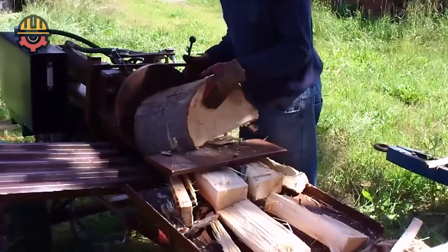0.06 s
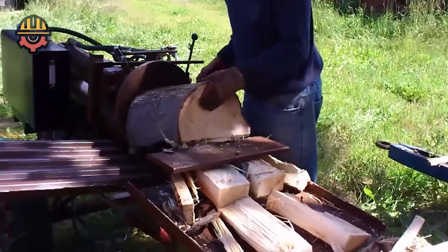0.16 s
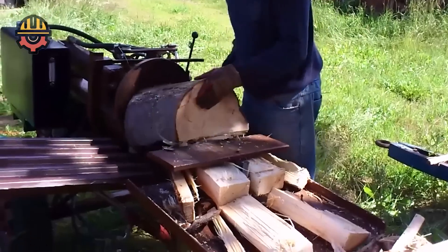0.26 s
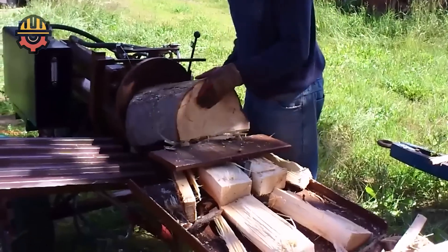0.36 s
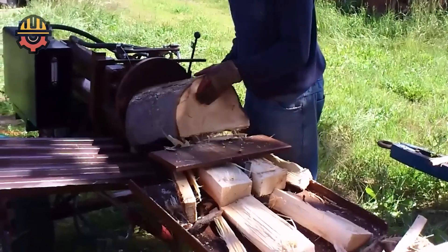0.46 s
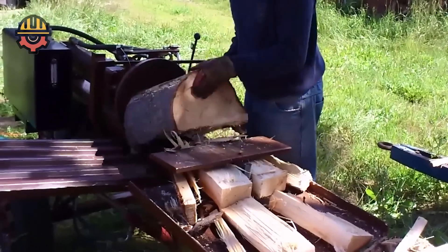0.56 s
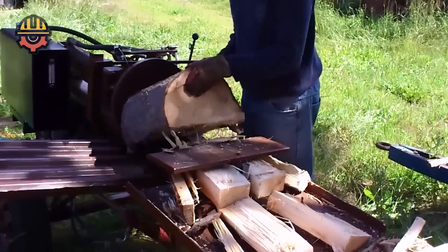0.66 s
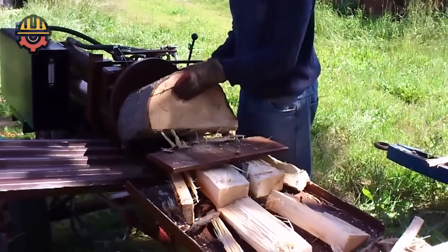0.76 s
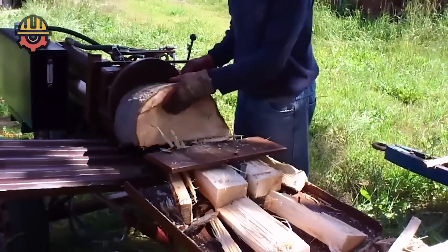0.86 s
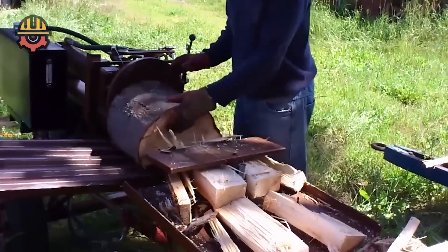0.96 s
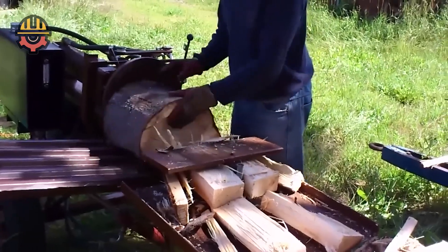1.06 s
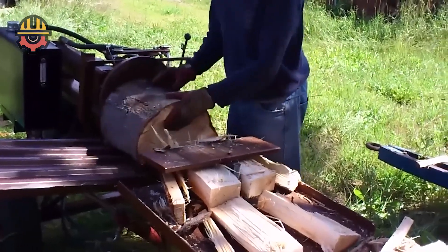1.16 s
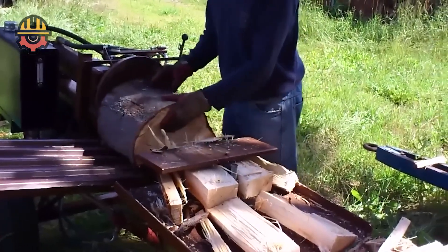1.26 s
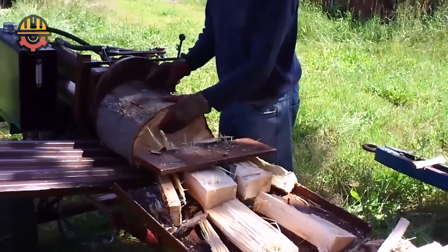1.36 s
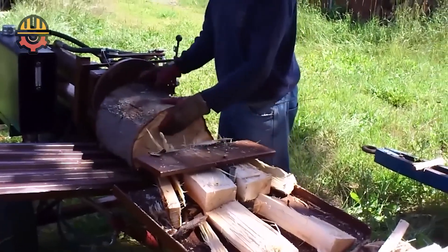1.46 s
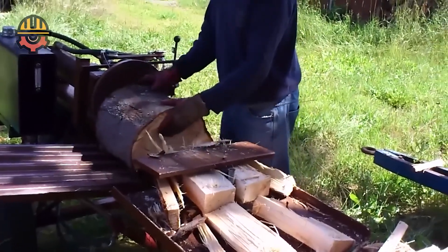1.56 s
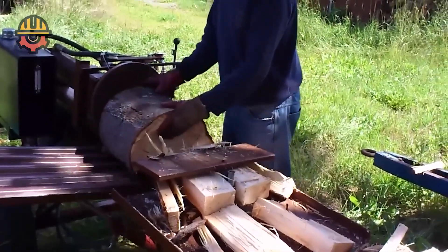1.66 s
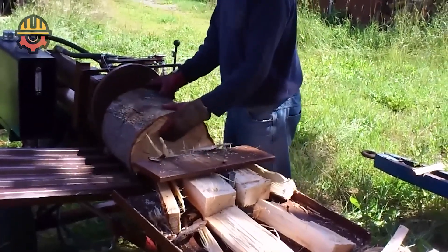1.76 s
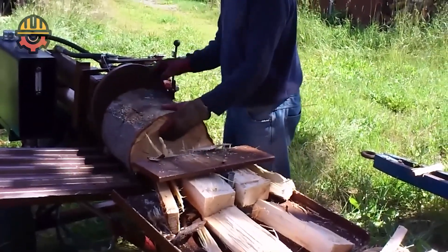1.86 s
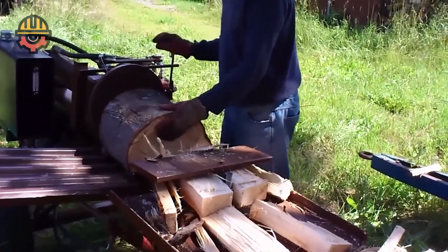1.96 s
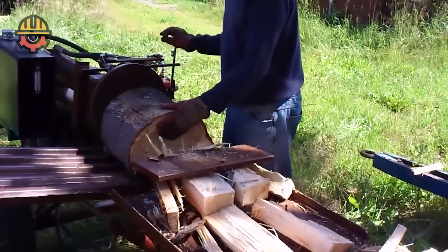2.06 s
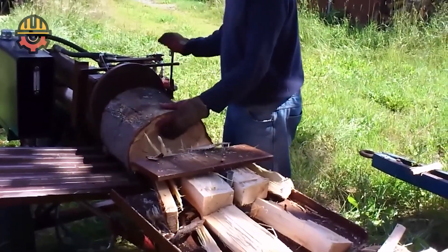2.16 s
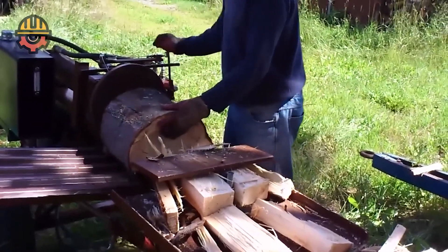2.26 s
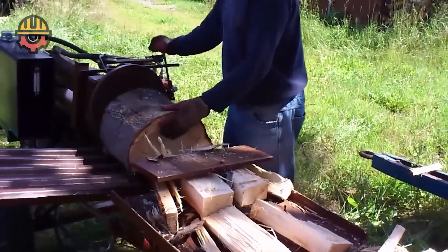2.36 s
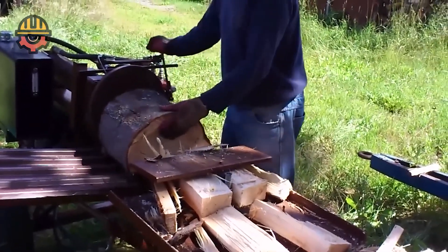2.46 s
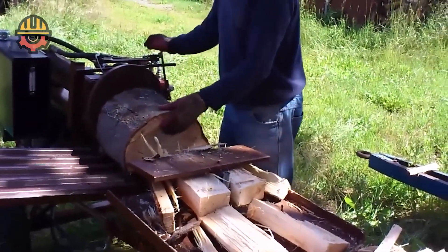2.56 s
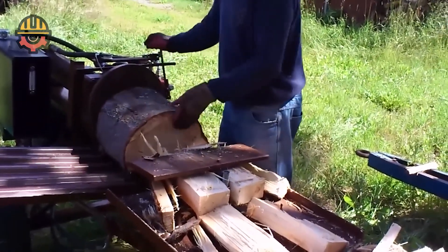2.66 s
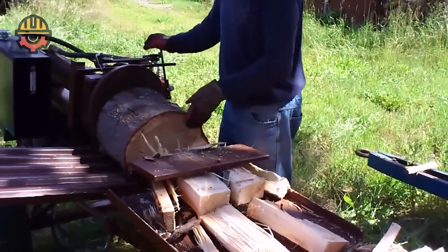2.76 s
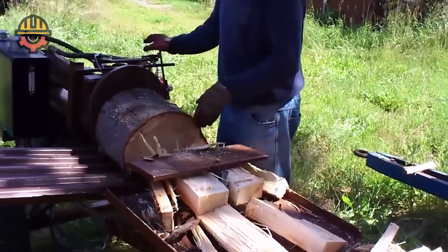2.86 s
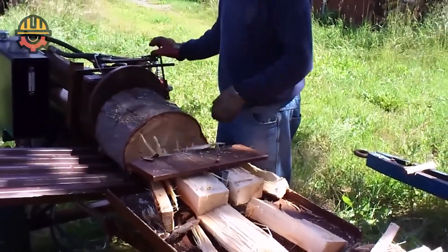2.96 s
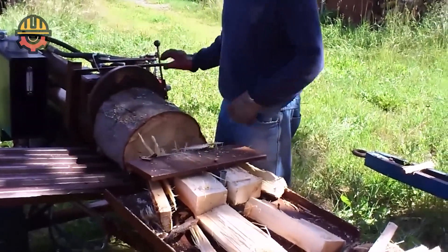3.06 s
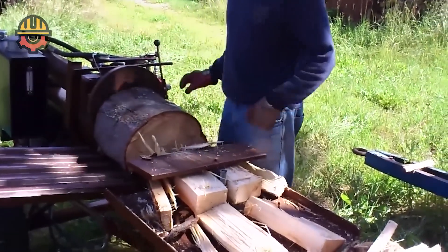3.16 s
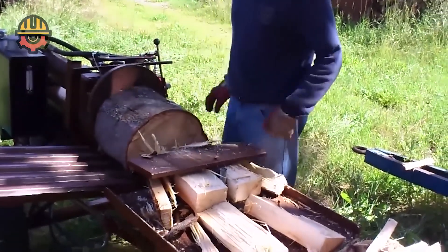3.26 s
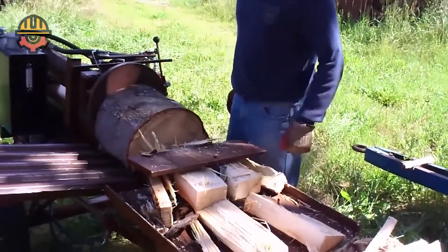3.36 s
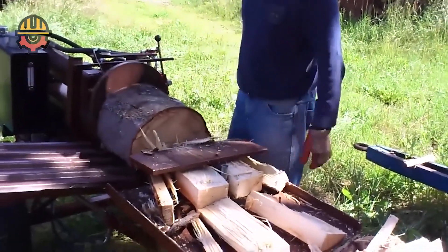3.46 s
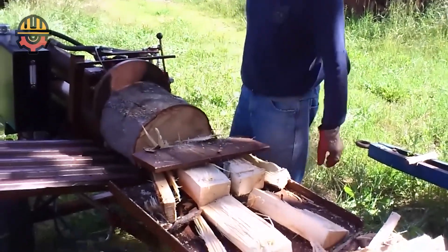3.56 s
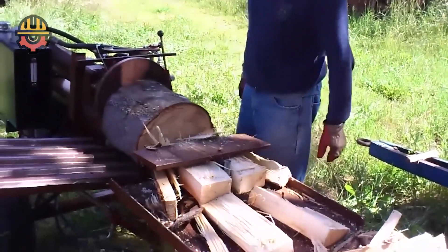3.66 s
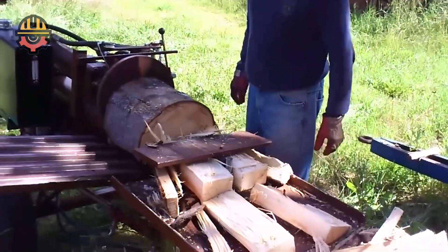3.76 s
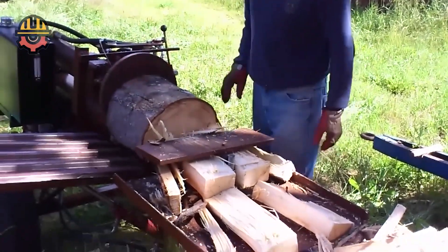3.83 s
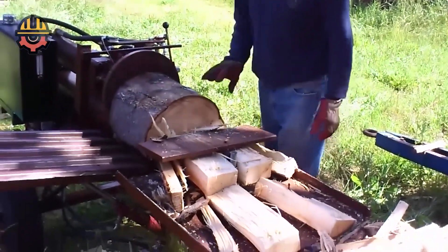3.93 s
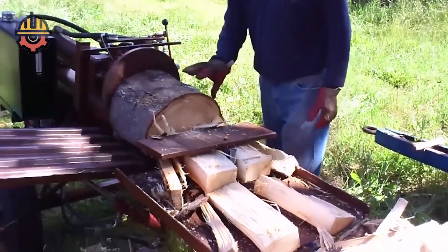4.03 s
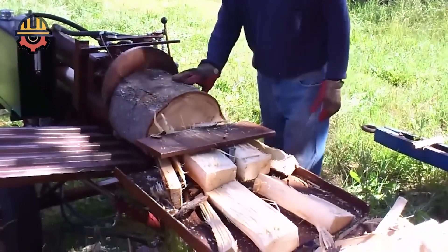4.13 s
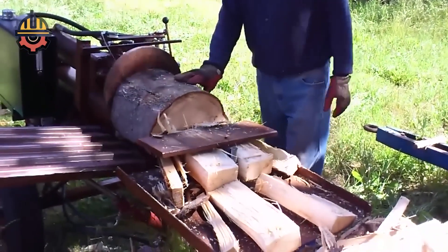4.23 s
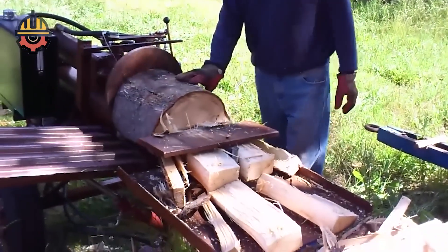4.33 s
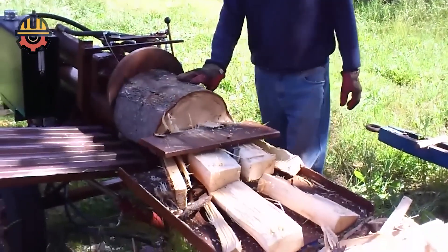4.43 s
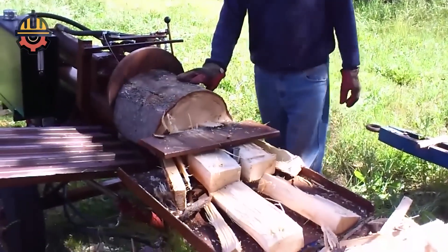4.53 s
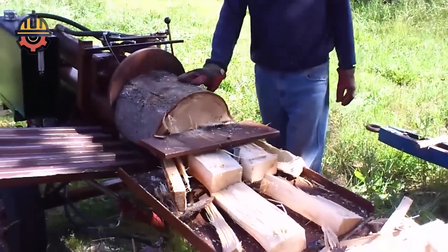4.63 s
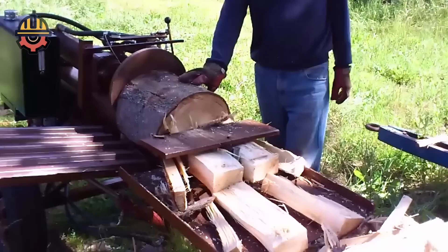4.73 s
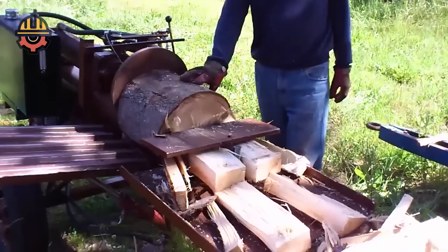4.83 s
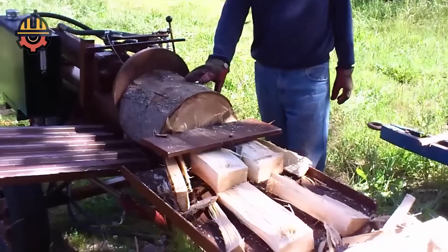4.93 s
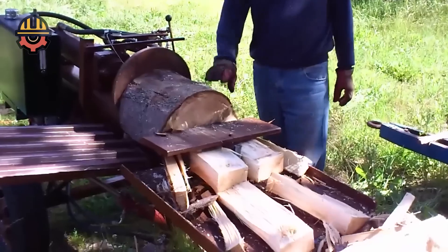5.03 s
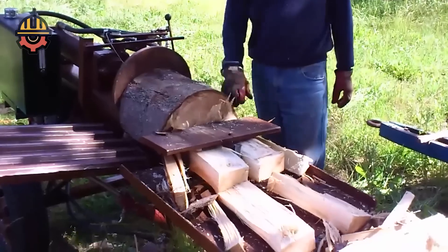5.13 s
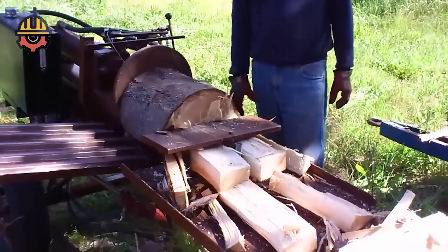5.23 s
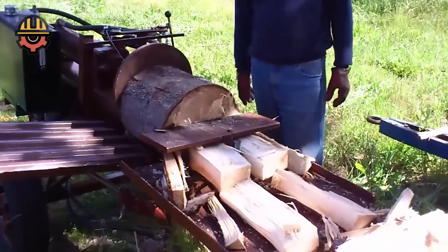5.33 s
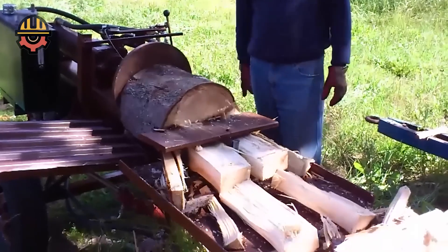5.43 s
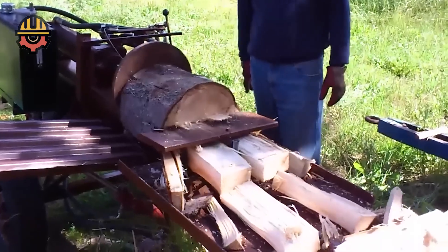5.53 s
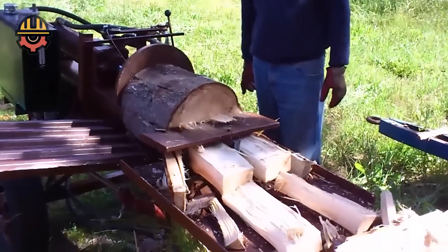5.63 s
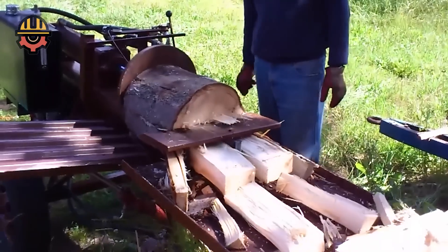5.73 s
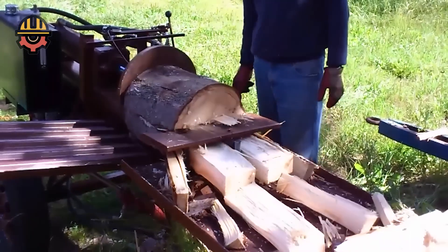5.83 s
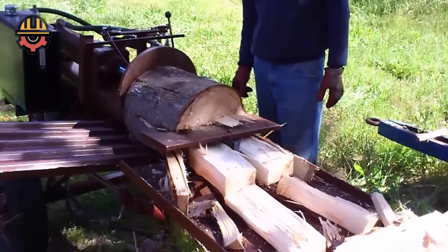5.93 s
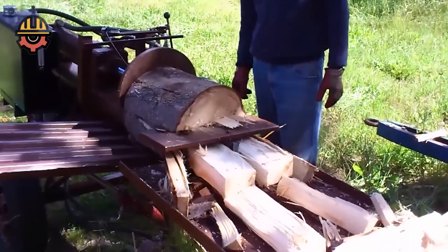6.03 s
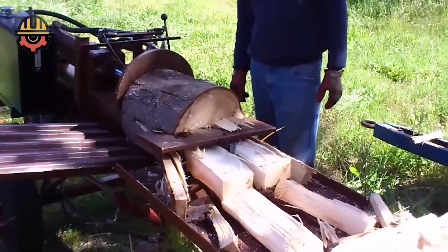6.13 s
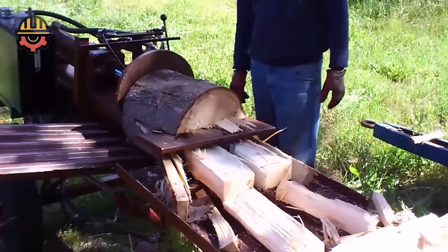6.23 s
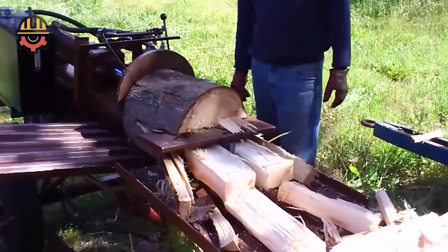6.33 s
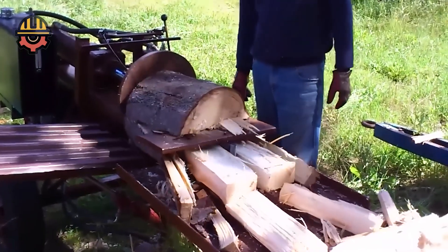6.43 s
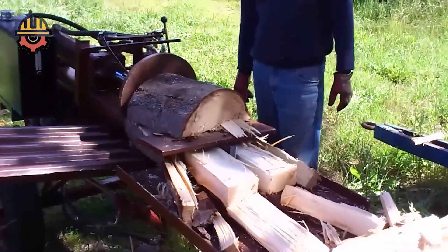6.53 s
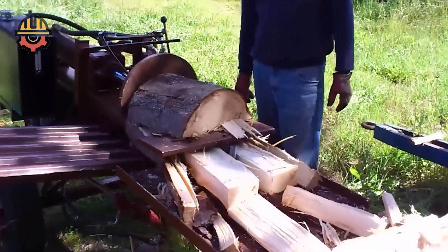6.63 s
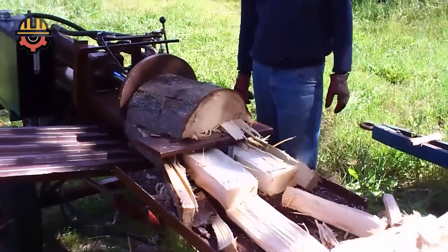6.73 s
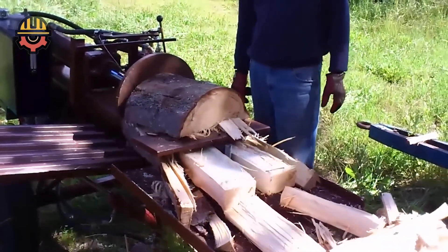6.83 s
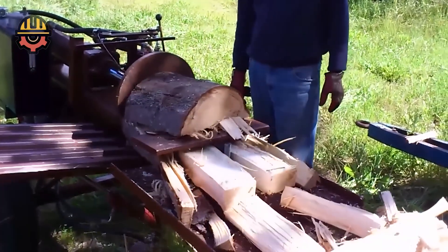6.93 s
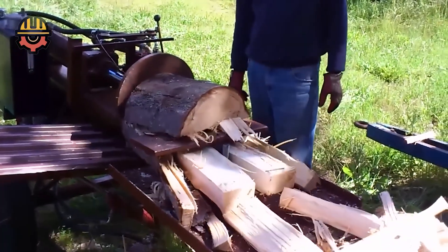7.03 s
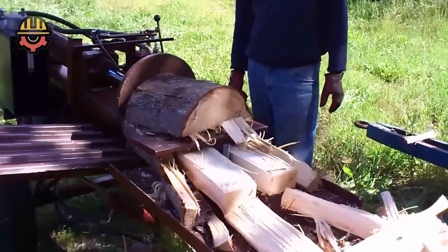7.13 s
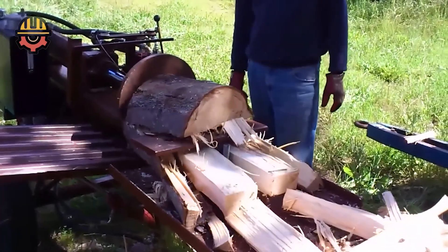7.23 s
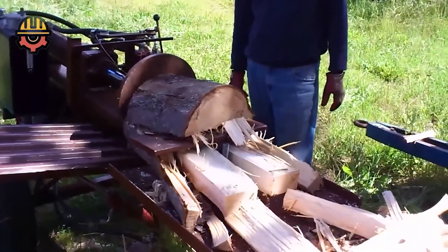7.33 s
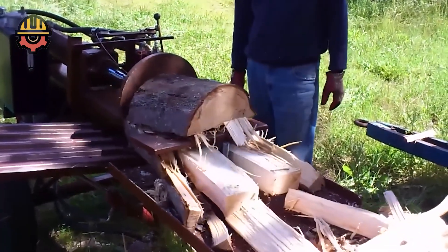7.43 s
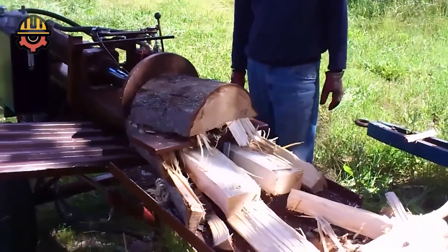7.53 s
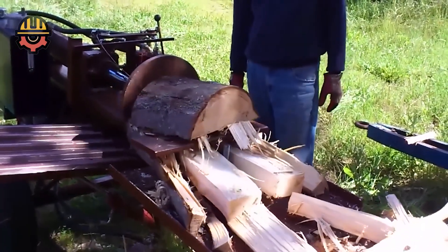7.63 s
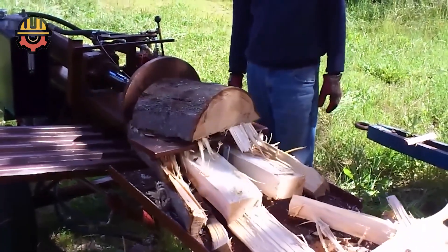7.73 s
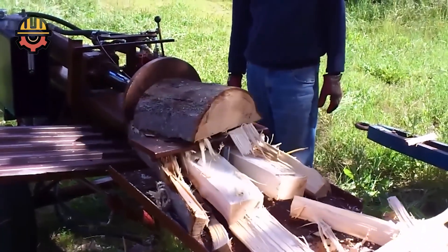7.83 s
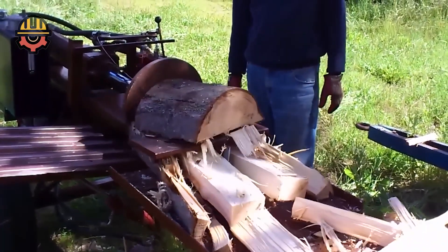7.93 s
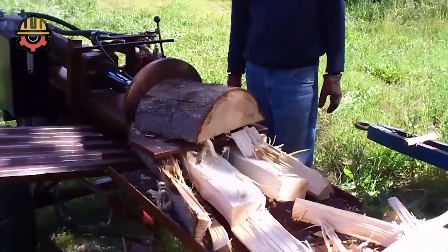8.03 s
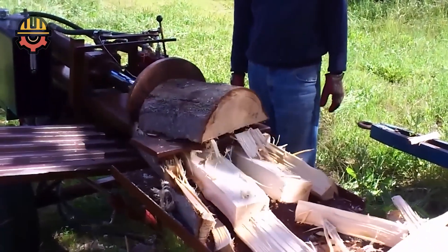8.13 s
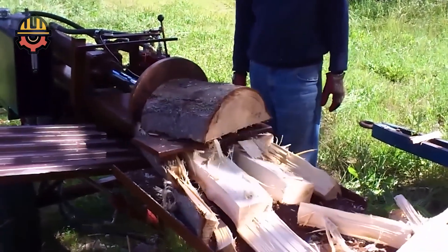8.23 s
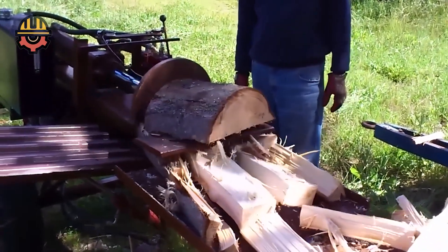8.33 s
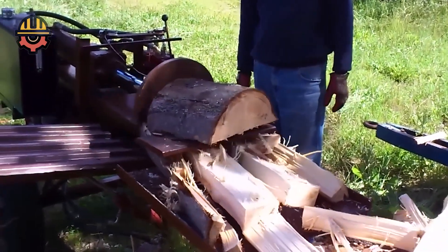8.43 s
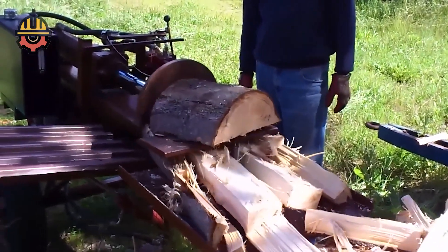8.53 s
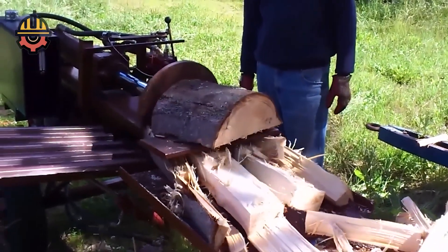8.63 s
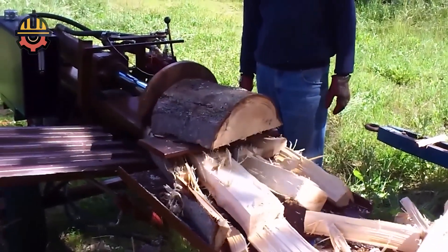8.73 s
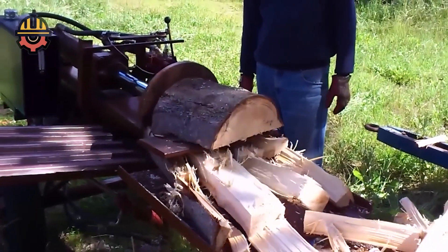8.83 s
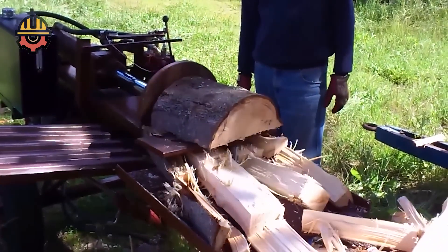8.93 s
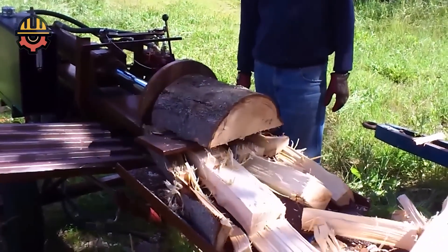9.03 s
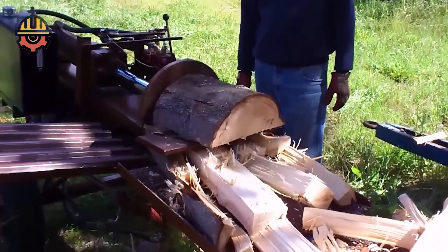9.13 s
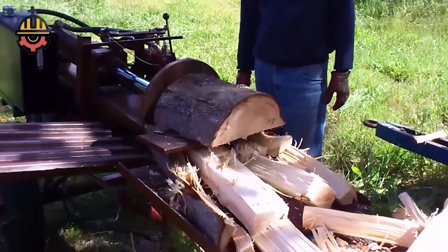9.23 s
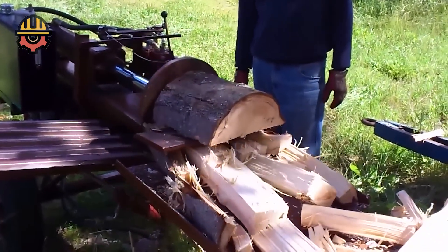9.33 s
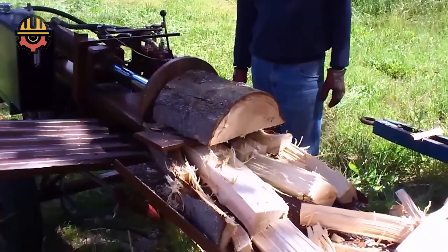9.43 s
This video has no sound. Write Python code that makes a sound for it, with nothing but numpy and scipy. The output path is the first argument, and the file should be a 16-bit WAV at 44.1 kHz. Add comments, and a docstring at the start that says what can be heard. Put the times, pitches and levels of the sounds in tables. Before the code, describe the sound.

Outdoors, a hydraulic splitter's electric whine sags under load while wood pops sparsely, then breaks into dense sharp cracks, fibrous ripping and hollow thuds.

```python
"""A gear pump whines in a yard from the first moment, over a soft rumble; soon wood cracks and thuds.
The pump is a stack of tooth tones plus rattle and hiss; an electric motor drives it and sags under load.
A log is rolled and dropped on the steel bed, then a ram pushes it through the blades. Cracks, tearing and
knocks on bed and tray are noise bursts through resonances; a blade groans in stick-slip jerks.
A pair of microphones hears it all from a few metres away."""
import sys
import numpy as np
from scipy import signal
from scipy.fft import rfft, irfft, next_fast_len
from scipy.io import wavfile
from scipy.ndimage import uniform_filter1d, map_coordinates

SR = 44100
rng = np.random.default_rng(int(sys.argv[2]) if len(sys.argv) > 2 else 0)


def generate_wav(signal):
    """Clip the signal to [-1, 1] and save it as 16-bit WAV at the path in sys.argv[1]."""
    frames = np.transpose(np.atleast_2d(signal))
    scaled = np.clip(frames, -1, 1) * 32767
    pcm = np.round(scaled).astype(np.int16)
    wavfile.write(sys.argv[1], SR, pcm)


N = 418068  # length in samples
TEETH = 12  # on the pump gear
TOP_HZ = 16300  # nothing much is heard above this
PUMP_LEAD, WOOD_LEAD = 5, 2  # samples by which the left microphone hears pump and wood first

# Relative noise spectrum of the motor and pump casing: pitch_hz [Hz], level_db [dB per Hz]
CASING_SPECTRUM = [(120, -21), (200, -14.5), (448, -19.5), (590, -5), (659, -9), (916, -15), (1810, -14.5),
                   (2650, -22), (3490, -16), (3830, -17), (4040, -12.5), (5130, -18), (8740, -14),
                   (13300, -24.5), (16000, -48)]
# Ringing modes of the log: pitch_hz [Hz], width_hz [Hz], level_db [dB]
LOG_MODES = [(540, 170, -4), (808, 45, 1), (1060, 35, -3), (1420, 190, -9.5)]


def undb(db):
    """Turn decibels into a gain."""
    return 10 ** (np.asarray(db) / 20)


def level(x, db):
    """Scale a sound to an rms level in dB."""
    return x * undb(db) / np.sqrt(np.mean(x ** 2))


def curves(table):
    """Columns of a table at every sample, joined by straight lines in time."""
    s, *columns = np.transpose(table)
    times = np.arange(N) / SR
    return [np.interp(times, s, column) for column in columns]


def on_log(table, hz):
    """Read a table at the given frequencies, with straight lines on a logarithmic pitch scale."""
    pitch_hz, value = np.transpose(table)
    return np.interp(np.log(hz + 1), np.log(pitch_hz), value)


def pair(a, b, hz, spectrum, lead):
    """Left and right spectra from two unrelated ones, alike in the bass, coloured; the right comes late."""
    # How alike the two sides are: pitch_hz [Hz], likeness [0 to 1]
    side_likeness = [(20, 0.76), (60, 1), (300, 0.98), (700, 1), (1400, 0.28), (3000, 0.42), (16000, 0.064)]
    likeness = np.clip(on_log(side_likeness, hz), -.95, .99)
    mid = a * np.sqrt(1 + likeness)
    side = b * np.sqrt(1 - likeness)
    delay = np.exp(-2j * np.pi * hz * lead / SR)
    return np.array([mid + side, (mid - side) * delay]) * undb(on_log(spectrum, hz))


def colour(a, b, spectrum, lead):
    """Stereo sound of rms 1 with the given spectrum."""
    n = next_fast_len(N)
    hz = np.arange(n // 2 + 1) * SR / n
    both = pair(rfft(a, n), rfft(b, n), hz, spectrum, lead)
    return level(irfft(both, n)[:, :N], 0)


def band(x, hz, width):
    """One resonance: keeps a band of the given width in Hz, within limits that keep the filter sound."""
    sharpness = max(hz / width, .3)
    return signal.lfilter(*signal.iirpeak(min(hz, .4 * SR), sharpness, SR), x)


def walk(rate):
    """Random levels rate times a second, joined smoothly; spread near 1."""
    k = int(SR / rate)
    levels = rng.standard_normal(N // k + 2)
    joined = np.interp(np.arange(N) / k, np.arange(len(levels)), levels)
    return 1.3 * uniform_filter1d(joined, k)


def swell(s, length, attack, fall_db_s, sag_db=0.):
    """Gain that rises, holds (sagging) until length is over, then dies away."""
    t = np.arange(N) / SR - s
    length = max(length, .005)
    db = -sag_db * np.clip(t / length, 0, 1) - fall_db_s * np.clip(t - length, 0, 2)
    return np.clip(t / max(attack, .002), 0, 1) ** 2 * undb(db)


def ring(x, modes):
    """A body that rings in short modes; neighbouring modes swing in opposite directions."""
    return sum((-1) ** k * undb(db) * band(x, hz, width) for k, (hz, width, db) in enumerate(modes))


def snaps(rate, spread_db):
    """Random clicks, a few much louder than the rest."""
    happens = rng.random(N) < rate / SR
    size = rng.standard_normal(N)
    return happens * size * undb(np.minimum(spread_db * rng.exponential(size=N), 10))


def add(out, s, x):
    """Mix a short sound into out, starting at s seconds."""
    i = int(s * SR)
    out[:, i:i + x.shape[-1]] += x[..., :N - i]


def pan(db):
    """Left and right gains, with the left louder by db."""
    return undb(np.array([[db], [-db]]) / 2)


def from_right(x, side_db):
    """Wood at the blades, right of the pump, reaches the left microphone early; the ground adds width."""
    late = np.roll(x, 300) * undb(side_db)
    return pan(0.33) * np.array([x + late, np.roll(x, WOOD_LEAD) - late])


def turn_rattle(turns, size=2048, count=24, keep=0.74):
    """Worn teeth and bearings repeat almost the same noise every shaft turn; the pattern drifts slowly."""
    hz = np.arange(size // 2 + 1) * 49.6  # multiples of the approximate shaft rate
    fresh = rng.standard_normal((2, count, len(hz))) + 1j * rng.standard_normal((2, count, len(hz)))
    # each pattern keeps a part of the one before
    drift = signal.lfilter([1], [1, -min(keep, .97)], fresh, axis=1)
    drift /= np.sqrt(np.mean(abs(drift) ** 2, axis=(0, 2), keepdims=True))
    spectra = pair(drift[0], drift[1], hz, CASING_SPECTRUM, PUMP_LEAD) * (hz < TOP_HZ)
    patterns = irfft(spectra, size)
    # glide from pattern to pattern while reading round each turn
    place = [np.linspace(0, count - 1, N), turns % 1 * size]
    return level(np.array([map_coordinates(np.c_[p, p[:, :1]], place, order=1) for p in patterns]), 0)


def pump():
    """Tooth tones, the rattle of each turn and oil hiss; the machine stands to the left."""
    # Tooth tones against the casing level: multiple [of the tooth rate], level_db [dB]
    tones = [(1, 0), (2, -4), (3, -11), (4, -19.5), (5, -20.5), (6, -18.5), (7, -12), (8, -10.5),
             (9, -16.5), (10, -22), (11, -9), (12, -4), (13, -10), (14, -3), (15, -16.5), (16, -35),
             (17, -14), (18, -13.5), (19, -15)]
    # Speed of the gear: start_s [s], tooth_rate_hz [Hz]
    speed = [(0, 595.0), (1.7, 594.7), (2.2, 595.6), (2.4, 597.4), (2.7, 595.6), (4.55, 595.7),
             (4.7, 593.9), (5.0, 594.2), (5.1, 593.0), (5.2, 589.8), (5.42, 586.2), (5.6, 593.8),
             (6.2, 592.2), (6.5, 593.5), (7.2, 594.7), (9.48, 594.2)]
    # The two hum tones swell and fade: start_s [s], 1st, 2nd tooth tone level_db [dB]
    hum = [(0, -35.5, -41.5), (0.8, -34.5, -50.5), (1.6, -32.5, -42.5), (2.15, -41, -51.5),
           (2.6, -35.5, -55), (3.0, -36.5, -59), (3.4, -38.5, -52), (4.2, -44, -52), (4.7, -34.5, -45),
           (4.95, -41.5, -44.5), (5.15, -36, -41.5), (5.19, -30.5, -38), (5.33, -33.5, -36),
           (5.45, -40.5, -45.5), (6.1, -35.5, -47), (6.5, -44, -42.5), (7.25, -36.5, -40.5),
           (8.4, -42.5, -44), (8.75, -62, -44.5), (9.0, -42, -42.5), (9.48, -44.5, -44.5)]
    # High tones trade strength as the oil pressure shifts:
    # start_s [s], 7th, 8th, 12th to 14th, 15th tooth tone level_db [dB]
    whine = [(0, -45.5, -50, -51, -60), (0.9, -47, -51, -49.5, -67), (1.5, -48.5, -58, -48, -65),
             (2.0, -45.5, -76, -52.5, -49), (2.35, -46.5, -69, -47, -55), (2.8, -45.5, -58, -55, -52),
             (3.4, -46.5, -59, -52, -49), (4.62, -49.5, -53, -56, -54), (4.67, -49, -50, -42.5, -57),
             (5.15, -48.5, -49, -40.5, -51), (5.4, -42, -48, -35, -36), (5.6, -46, -50, -42.5, -42),
             (7.3, -52, -56, -45.5, -44), (7.8, -49, -49, -46, -56), (8.4, -51, -52.5, -46, -51),
             (9.48, -54, -47, -45, -50)]
    # Tones between them: start_s [s], 9th, 10th, 11th tooth tone level_db [dB]
    upper = [(0.0, -62, -61, -50), (1.37, -61, -58, -49), (1.55, -69, -62, -48), (1.95, -66, -62, -55),
             (4.51, -55, -62, -54), (5.44, -53, -50, -44), (5.68, -53, -54, -50), (6.1, -47, -46, -48),
             (6.62, -51, -51, -51), (7.0, -42, -47, -46), (7.26, -54, -59, -54), (8.34, -54, -54, -44),
             (8.98, -52, -55, -46), (9.48, -59, -61, -57)]
    tones_db = -3  # added to tones without a curve of their own
    free_hz = 595.8  # tooth rate with no oil pressure
    full_sag_hz = 1  # the sag in tooth rate that shows most of the oil pressure
    free_casing_db, pressure_casing_db = -40, 3  # casing level when free, and what pressure adds
    step = 32  # slow controls are held for this many samples

    first_db, second_db = curves(hum)
    tooth_hz = curves(speed)[0]
    # oil pressure slows the motor, and sets how loud the casing is
    sag_hz = np.maximum(free_hz - tooth_hz, 0)
    pressure = 1 - np.exp(-sag_hz / full_sag_hz)
    casing_db = free_casing_db + pressure_casing_db * pressure
    seventh_db, eighth_db, squeal_db, top_db = curves(whine)
    cycles = np.cumsum(tooth_hz) / SR
    own = {1: first_db, 2: second_db, 7: seventh_db, 8: eighth_db, 12: squeal_db,
           **dict(zip((9, 10, 11), curves(upper))),
           13: squeal_db - 2, 14: squeal_db - 1, 15: top_db, 16: top_db - 4}
    shaft = 2 * np.pi * np.arange(1, 5)[:, None] * cycles / TEETH
    shaft = np.r_[np.cos(shaft), np.sin(shaft)]
    drifts = np.array([walk(2.98)[::step] for _ in range(6)])
    out = 0
    for k, db in tones:
        # low tones lead on the left; high ones arrive by different paths, a quarter cycle apart
        apart = min((k - 1) / 4, 1)
        lead = (1 - apart) * 0.46 * k + apart * rng.choice([-1, 1]) * np.pi / 2  # radians
        waver = apart * rng.standard_normal((2, 6)) @ drifts / np.sqrt(6)
        tone_db = own.get(int(k), casing_db + db + tones_db)[::step]
        waver_db = 1.3 if k in own else 2.2
        gain = undb(tone_db + waver_db * waver)
        phase = rng.uniform(0, 2 * np.pi) + np.array([[lead], [0]]) + 0.2 * waver[::-1]
        sine, cosine = (np.repeat(gain * f(phase), step, axis=1)[:, :N] for f in (np.cos, np.sin))
        # the shaft runs out of true, so the higher tones throb once a turn and at its multiples
        throb = np.sqrt(2) * (1 + 0.046 * apart * rng.standard_normal(8) @ shaft)
        turn = 2 * np.pi * k * cycles
        out = out + sine * (throb * np.sin(turn)) + cosine * (throb * np.cos(turn))
    rattle = undb(-5.0) * turn_rattle(cycles / TEETH)
    hiss = undb(-1 + 1.2 * walk(12)) * colour(*rng.standard_normal((2, N)), CASING_SPECTRUM, PUMP_LEAD)
    # oil squirts past every tooth and roughens the squeal
    squirt = band(rng.standard_normal((2, N)), 7540, 1860) * np.exp(-(cycles % 1) / 0.59)
    squirt = undb(squeal_db) * level(squirt, 4.9)
    return pan(3.6) * (out + squirt + undb(casing_db) * (rattle + hiss))


def yard_rumble():
    """Low noise of the yard, whose level wanders slowly."""
    # Relative noise spectrum of the rumble: pitch_hz [Hz], level_db [dB per Hz]
    rumble_spectrum = [(15, -59), (25, -27), (236, 0), (444, -7.5), (595, -57), (659, 0), (913, -16.5),
                       (1060, -2.5), (1500, -11), (1950, -50), (3300, -120)]
    gain = undb(-49.5 + 2.5 * walk(2.33))
    return gain * colour(*rng.standard_normal((2, N)), rumble_spectrum, WOOD_LEAD)


def cracks():
    """Each crack: a treble snap, a woody middle at its own pitch, and a blow into the log."""
    # Cracks of the wood, levels over their first 10 ms before panning: start_s [s], treble_db [dB],
    # middle_db [dB], middle_hz [Hz], log_body_db [dB], t60_s [s, limited below], left_minus_right_db [dB]
    crack_list = [(0.1829, -26.5, -30.5, 2440.0, -35, 0.064, 3), (0.205, -47, -31, 3540, -40, 0.013, 2),
                  (0.316, -56, -33.5, 3440, -37, 0.1, 5), (0.7442, -55, -30, 1000, -34, 0.007, 0),
                  (1.2165, -58, -29.5, 2170, -43, 0.12, 8), (1.299, -60, -36, 3830, -51, 0.095, 6),
                  (1.498, -57, -35, 2240, -53, 0.12, 4), (2.4253, -34.5, -51, 2450.0, -54, 0.13, 6),
                  (2.4455, -35, -38, 2200.0, -63, 0.032, 2), (2.498, -27.5, -34, 1810, -50, 0.054, 3),
                  (2.711, -27, -25, 2460, -61, 0.1, 2.5), (4.257, -42, -35, 4370, -67, 0.035, 5),
                  (4.383, -35.5, -48, 3360.0, -65, 0.022, 9), (4.5145, -50, -32, 1290.0, -28.5, 0.14, 4),
                  (4.668, -31.5, -38, 2950.0, -62, 0.12, 7), (4.7115, -22, -36, 3330.0, -47, 0.016, -1),
                  (4.7635, -30, -38, 2740.0, -54, 0.012, 4), (4.7796, -30, -34, 2460, -62, 0.012, 6),
                  (4.827, -26, -36, 3600, -68, 0.012, 4), (4.8365, -27, -29, 4800, -66, 0.016, 2),
                  (4.869, -40, -34.5, 2500, -60, 0.017, 8), (4.931, -35, -50, 4000, -65, 0.02, 3),
                  (5.175, -28.5, -36.5, 2840.0, -61, 0.061, 4), (5.447, -32, -24.5, 2030, -23, 0.055, 0),
                  (5.478, -35, -32, 2000, -32, 0.033, 0), (5.498, -33, -31, 1800, -27, 0.045, 0),
                  (5.5228, -24, -35, 3100.0, -54, 0.032, 2), (5.5371, -42, -29, 2200.0, -41, 0.056, 1),
                  (5.6012, -24, -35, 3510.0, -51, 0.026, 0), (5.723, -29.5, -41, 4100, -50, 0.12, 3),
                  (5.7558, -30, -44, 3000, -45, 0.02, 4), (5.809, -28, -24.5, 2300, -24, 0.15, 3.5),
                  (5.838, -41, -33, 1900, -23.5, 0.062, -3), (5.858, -39, -26, 1500, -31, 0.062, -7),
                  (5.882, -42, -23, 2470, -32, 0.18, 0), (6.024, -37, -29, 2410, -33, 0.14, 5),
                  (6.0584, -25, -31, 3350, -48, 0.14, 5), (6.105, -25, -29, 2740, -31, 0.15, 1),
                  (6.175, -23, -29, 3530, -49, 0.03, 0), (6.197, -30, -32, 3000, -43, 0.03, -3),
                  (6.2242, -27, -28, 4800, -50, 0.008, 4), (6.2612, -24.5, -26, 2180.0, -27.5, 0.11, 1),
                  (6.2982, -29, -28, 2650, -30.5, 0.14, 0), (6.3592, -27, -26, 3000, -32, 0.14, 3),
                  (6.3805, -33, -22, 2650, -21.5, 0.025, 0), (6.425, -41, -25.5, 2730, -30, 0.13, 0),
                  (6.437, -34, -25, 3700, -40, 0.015, 1), (6.4816, -33, -41, 3500, -55, 0.015, 2),
                  (6.4974, -23, -40, 3700, -56, 0.018, 1), (6.5525, -34, -45, 3500, -58, 0.015, 3),
                  (6.612, -25.5, -40, 3610.0, -38, 0.027, 4), (6.634, -21, -33, 2880, -50, 0.037, 1),
                  (6.6916, -25.5, -35, 3260, -58, 0.13, 3), (6.7089, -28, -28, 3090.0, -31.5, 0.038, -1),
                  (6.7442, -25, -34, 4230, -32.5, 0.034, 1), (6.7988, -30, -29.5, 3140, -33.5, 0.029, 2),
                  (6.841, -25, -26, 3160, -36, 0.091, -2), (6.8855, -24, -36, 3000, -28, 0.044, -2),
                  (7.1119, -22, -25.5, 2870.0, -32, 0.13, 0), (7.1922, -21.5, -28.5, 2660, -26.5, 0.038, 0),
                  (7.2167, -45, -28.5, 2500, -24, 0.093, 4), (7.4671, -30.5, -44, 2004, -45, 0.13, 2),
                  (7.5002, -32.5, -55, 4310.0, -51, 0.022, 7), (7.626, -32, -35.5, 3260.0, -42, 0.1, 4),
                  (7.6528, -30.5, -34, 3090.0, -58, 0.027, -2), (7.8073, -30, -36, 3480.0, -61, 0.024, 6),
                  (7.8308, -28, -40, 1940.0, -35.5, 0.019, 3), (7.9155, -39, -38.5, 3150, -43, 0.088, 7),
                  (8.0364, -35, -51, 3380.0, -63, 0.054, 7), (8.0555, -27, -52, 3650.0, -46, 0.017, 7),
                  (8.1472, -24.5, -27, 2600, -34, 0.043, 1.5), (8.433, -32, -43, 3320, -60, 0.04, 5),
                  (8.445, -39, -43, 4500, -60, 0.03, 5), (8.466, -34, -46, 4500, -60, 0.02, 5),
                  (8.528, -29, -23.5, 2340, -43, 0.032, 2), (8.6591, -32, -28, 2580, -56, 0.017, 5),
                  (8.6835, -26.5, -53, 4100, -57, 0.049, 3), (8.7546, -31.5, -37.5, 3170.0, -42, 0.079, 3),
                  (8.837, -35, -27.5, 5070, -38, 0.036, 2), (8.899, -36, -35, 3160.0, -57, 0.042, 7),
                  (8.9143, -54, -24.5, 2300, -24.5, 0.031, -1), (8.9348, -37, -23.5, 2520, -25.5, 0.03, 2),
                  (8.947, -23, -49, 2700.0, -51, 0.028, 0), (8.9567, -46, -30, 2250.0, -29.5, 0.025, 1),
                  (9.13, -26, -30, 5500.0, -57, 0.022, 2), (9.167, -31, -36, 2540.0, -55, 0.028, 4),
                  (9.185, -33, -36, 3090.0, -59, 0.04, 7), (9.454, -37, -36, 2720, -59, 0.029, 13)]
    front_s, front_gain = .0028, 1.1  # the sharp front of a crack, and its size over the tail
    out, t = np.zeros((2, N)), np.arange(3200) / SR
    for s, db, middle_db, hz, body_db, t60, pan_db in crack_list:
        noise = rng.standard_normal((3, len(t)))
        t60 = np.clip(t60, .006, .12)
        fade = np.exp(-np.log(1000) * t / t60) + front_gain * np.exp(-t / front_s)
        burst = (0.56 * noise[0] + noise[1:]) * fade  # a shared part plus one for each side
        burst *= 1 - .85 * np.exp(-t / .001)  # the split takes a moment to run
        # the first fibres part all at once, the more so in a short crack
        burst[0, 0] += 0.07 / t60
        burst[1, 0] += 0.065 / t60
        bright = undb(rng.uniform(-2, 1))  # thin fibres snap higher
        snap = band(band(burst, 7600 * bright, 5500), 7000 * bright, 6000)
        wood = band(band(burst, hz, 2.2 * hz), hz, 0.93 * hz)
        wood += undb(-11) * band(band(burst, 2 * hz, 1.5 * hz), 2 * hz, 1.5 * hz)  # an edge an octave up
        wood += undb(5) * band(burst, hz, .1 * hz)  # the splinter rings at its pitch
        # every billet is a different size, so its modes shift
        shift = undb(rng.uniform(-.8, 1.2))
        modes = [(f * shift, 1.8 * w, g) for f, w, g in LOG_MODES]
        body = ring(burst[0] + 0.14 * (burst - burst[0]), modes)
        layers = (db, snap), (middle_db, wood), (body_db, body)
        parts = sum(undb(g) * x / x[:, :SR // 100].std() for g, x in layers)
        add(out, s, pan(pan_db) * np.array([parts[0], np.roll(parts[1], WOOD_LEAD)]))
    return out


def crack_echo(hits):
    """The ground and sheds send back a short, thin echo of the cracks, made of fading noise."""
    t = np.arange(SR // 6) / SR
    echo = rng.standard_normal((2, len(t))) * np.exp(-np.log(1000) * t / 0.61)
    return undb(-39) * signal.fftconvolve(hits, echo, axes=1)[:, :N]


def tearing():
    """Thousands of fibres snap each second; the log booms along."""
    # Stretches of tearing: start_s [s], length_s [s], tearing_db [dB], log_body_db [dB]
    rips = [(0.185, 0.15, -48, -45), (1.113, 0.096, -37, -36), (4.51, 0.068, -40, -37),
            (4.67, 0.047, -36, -31.5), (4.745, 0.13, -38, -68), (5.376, 0.095, -27, -33),
            (5.442, 0.11, -30.5, -25.5), (5.744, 0.038, -26, -42), (5.77, 0.02, -28, -20),
            (5.815, .19, -25, -26), (6.06, 0.043, -26.5, -35), (6.112, 0.054, -28.5, -26.5),
            (6.172, 0.083, -26, -31.5), (6.276, 0.049, -28, -33), (6.249, 0.027, -30, -29),
            (6.377, 0.099, -28.5, -24), (6.597, 0.089, -32, -36), (6.688, 0.021, -20.5, -28),
            (6.76, 0.022, -37, -44), (6.825, 0.31, -23.5, -30.5), (7.177, 0.064, -34.5, -22),
            (8.936, .03, -35, -48), (9.066, 0.13, -38, -67)]
    # Relative noise spectrum of tearing fibres: pitch_hz [Hz], level_db [dB per Hz]
    fibre_spectrum = [(530, -33), (900, -49), (1070, -14), (1410, 3), (1620, -2.5), (2690, 0), (3040, -3),
                      (3730, -1), (8350, 0.5), (16000, -19)]
    # Fibres of each thickness snap on their own: pitch_hz [Hz], width_hz [Hz]
    tear_bands = [(1500, 1800), (3600, 2600), (7500, 5000), (13000, 6000)]
    attack_s, fall_db_s = 0.02, 220
    tear_sag_db, body_sag_db = 2, 10.5  # how far each fades while a rip lasts
    tear = sum(undb(db) * swell(s, length, attack_s, fall_db_s, tear_sag_db) for s, length, db, _ in rips)
    boom = sum(undb(db) * swell(s, length, attack_s, fall_db_s, body_sag_db) for s, length, _, db in rips)
    noise = 0
    for hz, width in tear_bands:
        flutter = undb(1.3 * walk(25))
        # every snap leaves a short tail of noise
        grain = np.convolve(abs(snaps(1300, 1.5)), np.exp(-np.arange(300) / 45.))[:N] ** .85
        rough = level(band(grain * rng.standard_normal((2, N)), hz, width), 0)
        noise = noise + np.sqrt(width) * flutter * rough
    fibres = colour(*noise, fibre_spectrum, WOOD_LEAD)
    body = level(ring(snaps(1200, 2.4), LOG_MODES), 0)
    torn = pan(1.2) * tear * undb(1.2 * walk(40)) * fibres
    return torn + from_right(boom * undb(2.0 * walk(30)) * body, -13)


def thuds():
    """Heavy wood lands on the steel bed: a low knock with a rough tail, over the drumming of the bed."""
    # Blows, levels before the stereo spread: start_s [s], peak_db [dB], centre_hz [Hz],
    # t60_s [s, limited below], bed_drumming_db [dB]
    blows = [(0.193, -34, 155, 0.13, -40), (0.209, -24, 356, 0.29, -52), (0.309, -32, 210, 0.18, -73),
             (1.001, -39, 96.9, 0.12, -46), (1.136, -17.5, 157, 0.19, -47), (1.218, -35, 131, 0.15, -51),
             (1.357, -37, 125, 0.11, -41), (4.514, -17, 530, 0.37, -45), (4.691, -30.5, 240, 0.22, -46),
             (5.448, -15, 530, 0.14, -36.5), (5.473, -24, 503, 0.23, -40), (5.808, -15.5, 495, 0.44, -30.5),
             (6.021, -19, 500, 0.13, -46), (6.137, -19, 540, 0.15, -47), (6.262, -20, 540, 0.14, -48),
             (6.381, -14.5, 456, 0.5, -38), (7.191, -18.5, 504, 0.42, -33), (8.913, -34, 400, 0.19, -47)]
    # Resonances of a knock: multiple [of its centre], width [share of the pitch, widened below], level_db [dB]
    knock_modes = [(.42, 0.38, -6.5), (.7, 0.29, -2), (1, 0.15, 5), (1.45, 0.08, -3), (2.4, 0.27, -13)]
    attack_s, fall_db_s, rest_db = 0.031, 105, -65  # the bed also trembles faintly between blows
    out, t = np.zeros((1, N)), np.arange(SR // 2) / SR
    for s, db, hz, t60, _ in blows:
        tail = np.exp(-np.log(1000) * t / np.clip(t60, .03, .4))
        push = rng.standard_normal(len(t)) * tail + 5 * np.exp(-t / 0.0004)
        knock = sum(undb(g) * band(band(push, m * hz, w * m * hz), m * hz, 1.4 * m * hz)
                    for m, w, g in knock_modes)
        add(out, s, undb(db) * knock / abs(knock).max())
    shake = rng.standard_normal(N)
    drum = band(shake, 107.0, 34.0) + undb(-26) * band(band(shake, 80.0, 100.0), 86.0, 140.0)
    bed = sum(undb(row[4]) * swell(row[0], attack_s, attack_s, fall_db_s) for row in blows)
    rest = undb(rest_db + 6.3 * walk(10))
    return from_right(out[0] + (bed + rest) * level(drum, 0), -21.5)


def valve():
    """The control valve squeaks as it shifts: a wavering tone with an overtone a fifth above."""
    start_s, length_s, pitch_hz, level_db = 2.28, .15, 1203, -44  # pitch and level waver around these
    turn = 2 * np.pi * np.cumsum(pitch_hz * (1 + 0.012 * walk(60))) / SR
    on = swell(start_s, length_s, .03, 600) * undb(level_db + 4 * walk(50))
    return pan(3.6) * np.sqrt(2) * on * (np.sin(turn) + undb(-7) * np.sin(3 / 2 * turn))


def groan():
    """Fairly regular stick-slip jerks ring the blade, whose pitch bends as the wood presses on it."""
    # A billet drags along a blade: start_s [s], length_s [s], level_db [dB]
    drags = [(6.864, 0.248, -29.5), (7.806, 0.05, -36)]
    # Bend of the blade's pitch: start_s [s], pitch [relative to rest]
    glide = [(6.85, 0.98), (6.9, 1.03), (6.94, 0.99), (7.03, 0.99), (7.09, 1.005), (7.15, 0.83),
             (7.8, 1.03)]
    # Ringing modes of the blade at rest: pitch_hz [Hz], width_hz [Hz], level_db [dB]
    blade_modes = [(710, 150, -2), (1183, 60, -9), (1420, 90, -1), (1810, 50, -11), (2680, 170, -3),
                   (3900, 130, -3), (5030, 90, -9)]
    attack_s, fall_db_s = 0.05, 500
    squeak_hz, squeak_db = 1420, -5.5  # the blade mode that keeps itself singing while the wood drags
    # about 108 slips a second, unequal in strength, over faint scraping
    slips = np.diff(np.floor(np.cumsum(108 * undb(.7 * walk(60))) / SR), prepend=0)
    jerks = slips * undb(2.0 * rng.standard_normal(N)) + 0.028 * rng.standard_normal(N)
    bend = 2 * np.pi * np.cumsum(curves(glide)[0]) / SR
    ringing = 0
    for hz, width, db in blade_modes:
        pole = np.exp(-np.pi * width / SR)
        # shift the mode down to zero pitch, filter there, and shift back: the resonance follows the bend
        still = signal.lfilter([(1 - pole) ** 2], [1, -2 * pole, pole ** 2], jerks * np.exp(-1j * hz * bend))
        ringing = ringing + undb(db) * level((still * np.exp(1j * hz * bend)).real, 0)
    sing = np.sin(squeak_hz * (bend + 2 * np.pi * np.cumsum(.012 * walk(100)) / SR))
    blade = level(ringing, 0) + undb(squeak_db + 2.2 * walk(70)) * level(sing, 0)
    drag = sum(undb(db) * swell(s, length, attack_s, fall_db_s) for s, length, db in drags)
    return from_right(drag * level(blade, 0), -18)


def scene():
    """Pump and yard throughout, with the wood, the valve and the groaning blade on top."""
    hits = cracks()
    wood = hits + crack_echo(hits) + tearing() + thuds()
    return pump() + yard_rumble() + wood + valve() + groan()


def record(dry):
    """The microphones' steep low-pass filter removes the highest treble."""
    return signal.sosfilt(signal.ellip(10, .2, 80, TOP_HZ, fs=SR, output="sos"), dry)


dry = scene()
out = record(dry)
generate_wav(out)
```